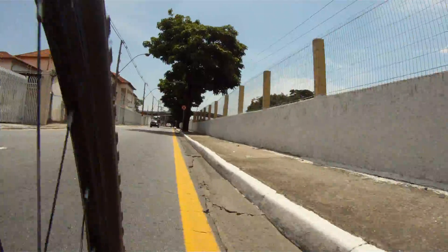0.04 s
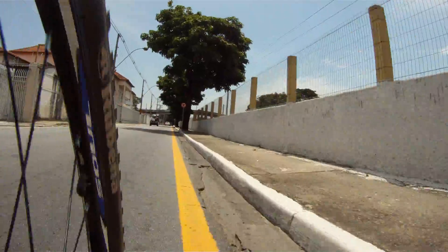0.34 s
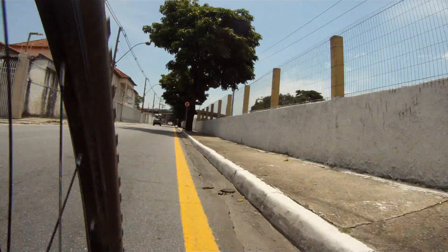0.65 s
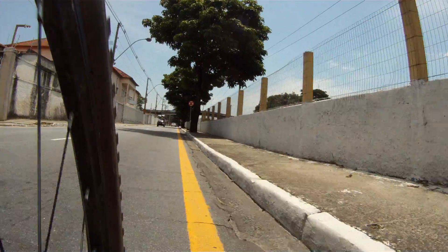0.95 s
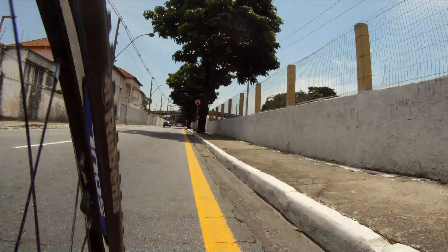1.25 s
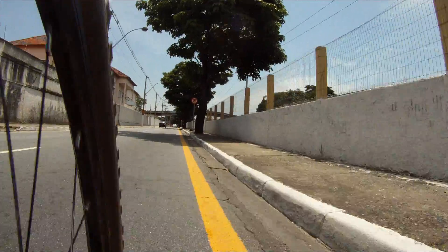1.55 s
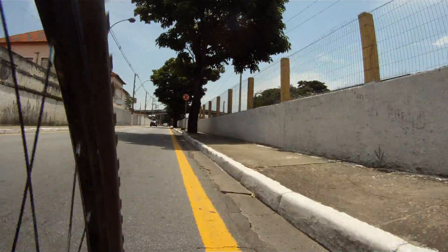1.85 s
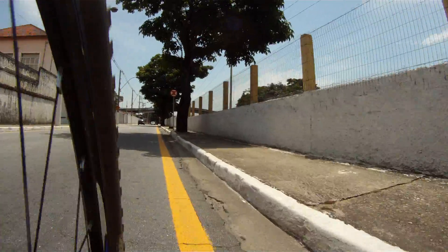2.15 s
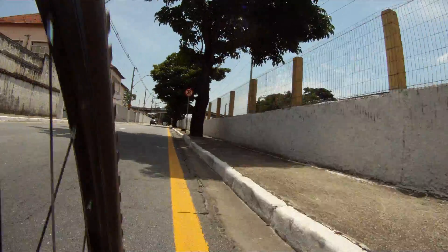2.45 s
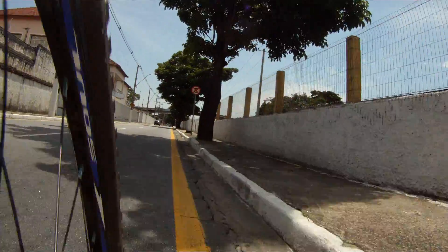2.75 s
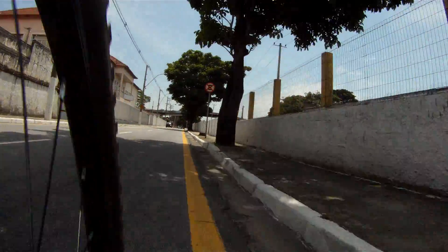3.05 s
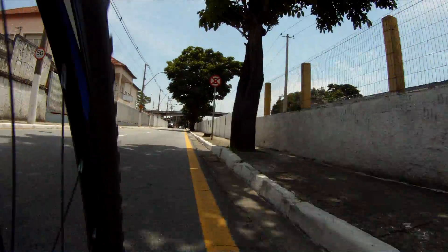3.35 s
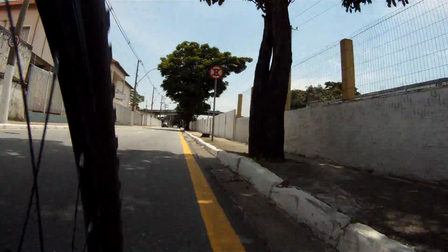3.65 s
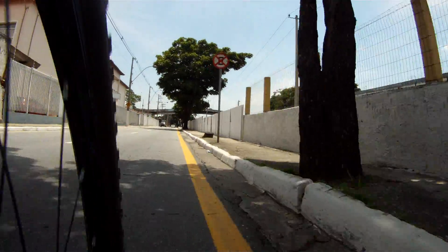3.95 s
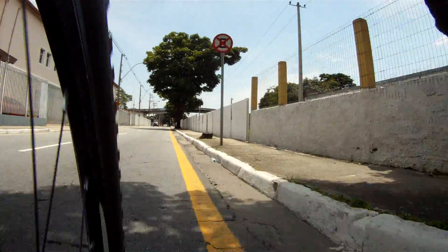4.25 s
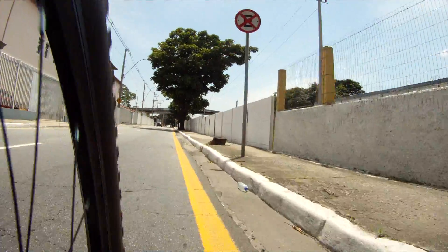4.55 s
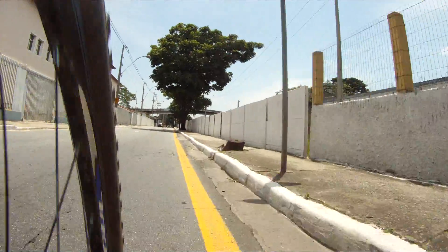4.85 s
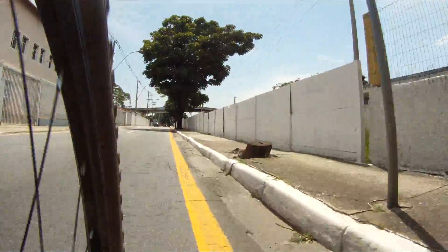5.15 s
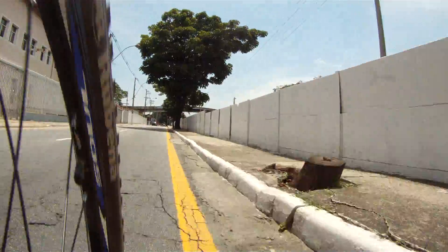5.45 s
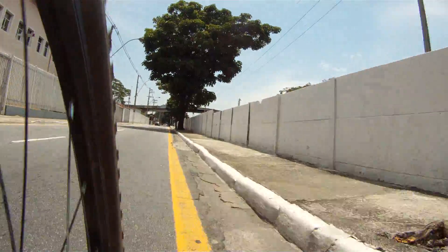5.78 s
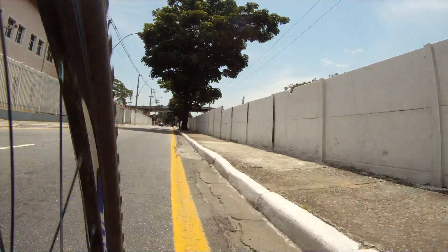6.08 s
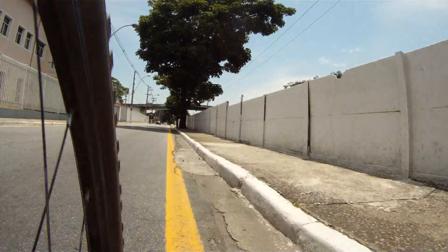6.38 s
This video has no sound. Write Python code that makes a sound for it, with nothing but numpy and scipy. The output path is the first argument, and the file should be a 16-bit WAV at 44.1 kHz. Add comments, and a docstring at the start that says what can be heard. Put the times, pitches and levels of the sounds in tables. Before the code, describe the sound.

A bicycle rolls along an asphalt street for about six and a half seconds, heard very close from beside the wheel. A low, fluttering tyre hum and the rumble of the frame on the rough surface dominate throughout. The hum wavers slightly with the pedalling and creeps up in pitch from about 2 seconds. At 0.3 seconds the wheel hits a crack with one hard thump, the loudest moment, and everything briefly ducks after it. Much softer bumps come at about 2 and 3.5 seconds. The chain rustles faintly in swells with the pedal strokes. Loose metal fittings give small irregular rattles, clustering around 1 second and 5 seconds. Grit ticks and sand crackles faintly under the tyre, and a faint, thin high whistle lies over everything. The hum drops away for an instant near 6.5 seconds, then returns.

```python
"""Bicycle on asphalt

Riding along a street, heard close up from the microphone of a small camera fixed beside the wheel.
The tread hums, the rough road shakes the frame, the chain rustles with the pedal strokes, loose
fittings rattle and grit ticks. One crack jolts the bicycle hard enough to duck the camera's limiter.
The camera holds each sample at a low rate, which mirrors the whole sound into a thin high whistle."""
import sys
import numpy as np
from scipy import signal
from scipy.fft import rfft, irfft
from scipy.io import wavfile
from scipy.ndimage import uniform_filter1d, minimum_filter1d

SR = 44100
rng = np.random.default_rng(int(sys.argv[2]) if len(sys.argv) > 2 else 0)


def put_to_file(sound):
    """Save the sound as 16-bit audio at rate SR, in the file named by the first command-line argument."""
    columns = np.atleast_2d(sound).T  # one column per channel
    safe = np.clip(columns, -1, 1)
    whole_steps = np.round(safe * 32767)
    wavfile.write(sys.argv[1], SR, whole_steps.astype(np.int16))


N = 291942
T = np.arange(N) / SR
BIN_HZ = np.fft.rfftfreq(N, 1 / SR)


# strength of the tread hum beside the wheel: time_s, relative_db
HUM_LEVEL = [(0, -13), (0.55, -15.5), (0.7, -13), (1.05, -14.5), (1.7, -13), (3.5, -13.5), (4.2, -12),
             (4.93, -17.5), (5.12, -13), (5.85, -17.5), (6.18, -14.5), (6.38, -13), (6.48, -30.5),
             (6.62, -14)]
# harmonics of the hum: multiple, relative_db
HUM_HARMONICS = [(1, -2), (2, -19.5), (3, -24.5), (4, -38.5)]
def tyre(blocks, level_db=-1.4, dip_db=6.0, dip_per_road_db=0.15, flutter_hz=16):
    """The tread hums next to the microphone; bumps unload the tyre and make the hum dip briefly."""
    hum = sum(gain_of(db) * np.sin(2 * np.pi * (round(multiple) * blocks + rng.random()))
              for multiple, db in HUM_HARMONICS)
    bumps_db = curve(ROAD_ROUGHNESS)
    unevenness = np.exp(dip_per_road_db * (bumps_db - bumps_db.mean()))  # rougher road, deeper dips
    lift = np.tanh(np.maximum(drift(flutter_hz), 0) ** 2 / 2)
    return unit_rms(hum) * gain_of(curve(HUM_LEVEL) + level_db - dip_db * unevenness * lift)


# riding speed, as the rate of tread blocks meeting the road: time_s, pitch_hz
TREAD_RATE = [(0, 137.5), (1.05, 136.1), (2.2, 141.1), (2.42, 144.3), (2.65, 143.8), (4.0, 147.4),
              (4.7, 145.7), (5.95, 149.8), (6.62, 146.8)]
def tread_blocks(push_every_s=0.505, surge_at_s=0.383, surge_hz=1.29, waver=0.0062):
    """Count of tread blocks that have met the road; the speed surges a little with each leg's push."""
    surge = surge_hz * np.cos(2 * np.pi * (T - surge_at_s) / push_every_s)
    rate_hz = (curve(TREAD_RATE) + surge) * (1 + waver * drift(13.7))
    return np.cumsum(rate_hz) / SR


# unevenness of the street under the wheel: time_s, long_bumps_db, coarse_grain_db
ROAD_ROUGHNESS = [(0.0, -22, -19), (0.55, -21.5, -19.5), (0.75, -24.5, -21.5), (1.15, -25, -17),
                  (1.35, -26.5, -19), (1.8, -28, -25), (2.1, -26, -21.5), (2.9, -27, -23),
                  (3.4, -23.5, -21), (4.2, -30.5, -24), (4.62, -22, -19.5), (4.88, -25.5, -23.5),
                  (5.01, -21.5, -18.5), (5.27, -29, -24.5), (5.5, -23.5, -18), (5.85, -18.5, -20),
                  (6.2, -28.5, -20), (6.62, -18, -18)]
# the whole bicycle bouncing and flexing on its tyres: pitch_hz, width_hz, relative_db
SWAY_MODES = [(25, 12, -6), (54, 18, 0), (88, 15, 5), (121.2, 13, 3)]
# resonances of the frame and camera mount: pitch_hz, width_hz, relative_db
FRAME_MODES = [(166, 50.4, 0.5), (239.6, 27, -1), (285, 56, -7.5), (334, 76, -13), (405, 55, -11),
               (426.6, 33, -12.5), (550, 49, -22.5), (759, 98, -27)]
def frame(drumming_db=-1.0, flicker_db=0.8):
    """Long bumps rock the bicycle; the stones of the asphalt drum on frame and mount."""
    sway = coloured_noise(modes(SWAY_MODES)) * gain_of(curve(ROAD_ROUGHNESS))
    stones = clicks(per_s=2500, spread_db=3.5) * gain_of(flicker_db * drift(35))
    drumming = unit_rms(ring(stones, modes(FRAME_MODES)))
    return sway + drumming * gain_of(curve(ROAD_ROUGHNESS, column=2) + drumming_db)


# cracks in the street: crest_s, envelope_peak_db, pitch_hz, rise_s
CRACKS = [(0.3228, 8.5, 194, 0.004), (2.041, -11, 290, 0.0016), (3.456, -16, 297, 0.0037)]
def jolts(clatter_db=-33, scrape_db=-47, fall_ratio=0.62):
    """A crack thumps the frame, swelling and stopping short; housing and sand clatter with it."""
    thump, shake = np.zeros(N), np.zeros(N)
    for crest_s, db, hz, rise_s in CRACKS:
        width_s = np.where(T < crest_s, rise_s, fall_ratio * rise_s)
        push = gain_of(db) * np.exp(-((T - crest_s) / width_s) ** 2)
        thump += push * np.sin(2 * np.pi * hz * (T - crest_s))
        shake += push
    clatter = gain_of(clatter_db) * coloured_noise(modes(HOUSING_MODES))
    scrape = gain_of(scrape_db) * coloured_noise(colour(GRIT_COLOUR))
    return thump + shake * (clatter + scrape)


# hard pedal strokes that make the chain rustle: middle_s, swell_db, length_s
PEDAL_STROKES = [(0.25, 2, 0.5), (1.08, 4.5, 0.35), (2.06, 3, 0.24), (2.76, 4, 0.1), (3.16, 4.5, 0.38),
                 (4.08, 4.5, 0.17), (4.66, 2.5, 0.2), (5.04, 4, 0.2), (5.48, 2, 0.3), (6.15, 4.5, 0.28),
                 (6.6, 5.5, 0.14)]
# the camera housing around the microphone: pitch_hz, width_hz, relative_db
HOUSING_MODES = [(739, 90, 4), (813.6, 44, 8.5), (1030, 98, -6.5), (1113, 190, -4), (1300, 43, 2.5),
                 (1450, 210, -4.5), (1745, 140, -2.5), (2027, 110, -2), (2300, 400, -5.5), (3060, 160, -19),
                 (3510, 250, -15), (4770, 2700, -25.5)]
def chain(blocks, rustle_db=-47.0, jingle_db=-59.0, flicker_db=2.5, waver_db=0.58, throb=0.18):
    """Dense knocks of the links ring the housing in time with the tread; a few jingle the fittings."""
    knocks = clicks(per_s=5000, spread_db=0.5) * gain_of(flicker_db * drift(77))
    knocks *= 1 + throb * np.cos(2 * np.pi * blocks)
    rustle = gain_of(rustle_db) * unit_rms(ring(knocks, modes(HOUSING_MODES)))
    t = np.arange(4096) / SR
    metal = sum(gain_of(db - 60 * t / t60) * np.sin(2 * np.pi * hz * t) for hz, db, t60 in FITTING_MODES)
    taps = clicks(per_s=55, spread_db=2.5)
    jingle = gain_of(jingle_db) * unit_rms(signal.oaconvolve(taps, metal)[:N])
    return (rustle + jingle) * gain_of(swells(PEDAL_STROKES) + waver_db * drift(18))


# knocks of loose fittings on the bicycle: start_s, relative_db
FITTING_KNOCKS = [(0.8882, -36.5), (1.0228, -33.5), (1.153, -31.5), (1.23, -35), (1.8097, -36.5),
                  (2.0334, -31.5), (2.2886, -34), (2.967, -38), (2.9857, -35), (3.7478, -35),
                  (3.997, -37.5), (4.2657, -39), (4.7329, -34), (4.9622, -32.5), (4.996, -36),
                  (5.218, -39.5), (5.27, -40), (5.369, -33), (5.574, -39), (5.9918, -37), (6.1956, -35),
                  (6.2583, -34)]
# ring of the metal fittings: pitch_hz, relative_db, t60_s
FITTING_MODES = [(1290, -6.5, 0.021), (1750, -3.5, 0.031), (2280, -7, 0.025), (2364, 4, 0.043),
                 (2360, -6, 0.033), (3190, -11, 0.059), (3550, -5.5, 0.031)]
def rattles(level_db=3.0, vary_db=3.5):
    """Each knock rings the same metal fittings in a slightly different mix."""
    t = np.arange(4096) / SR
    hz, db, t60 = np.transpose(FITTING_MODES)[:, :, None]
    track = np.zeros(N + len(t))
    for start_s, knock_db in FITTING_KNOCKS:
        mix, polarity = rng.standard_normal((2, len(FITTING_MODES), 1))
        decays = gain_of(db + vary_db * mix - 60 * t / t60)
        knock = (decays * np.sign(polarity) * np.sin(2 * np.pi * hz * t)).sum(0)
        track[round(start_s * SR):][:len(t)] += gain_of(knock_db + level_db) * knock / abs(knock).max()
    return track[:N]


# larger grains of grit under the tyre: start_s, relative_db
GRIT_TICKS = [(0.169, -42), (0.198, -49), (0.472, -50), (0.61, -42), (0.6605, -35), (1.596, -44),
              (1.9894, -36.5), (2.5326, -42), (2.6717, -41.5), (3.09, -41.5), (3.302, -43), (3.478, -45),
              (3.5793, -43), (3.688, -45), (3.7479, -41), (4.5989, -41), (4.612, -45), (4.6573, -41.5),
              (4.784, -39), (4.897, -42), (4.9547, -41), (5.0163, -45), (5.667, -45), (5.873, -43),
              (5.9905, -44), (6.2657, -42), (6.4223, -43.5)]
# colour of grit at the microphone: frequency_hz, gain_db
GRIT_COLOUR = [(300, -28), (1200, -9.5), (2300, -2), (2900, -3.5), (3600, -1.5), (4200, -5), (4900, -0.5),
               (5600, -2), (6300, -3.5)]
def grit(level_db=20.0, grain_hz=4000, pitch_spread=0.063, crumble=0.4, crumble_s=0.0034):
    """A larger grain snaps under the tyre, then crumbles for a moment."""
    t = np.arange(512) / SR
    track = np.zeros(N + 1024)
    for start_s, db in GRIT_TICKS:
        fragments = rng.standard_normal(len(t))
        hz = grain_hz * np.exp(pitch_spread * np.tanh(fragments[-1]))
        fracture = (t == 0) + crumble * fragments * np.exp(-t / crumble_s)
        tick = np.convolve(fracture, snap(hz, ring_s=0.00019))
        track[round(start_s * SR):][:len(tick)] += gain_of(db + level_db) * tick / np.linalg.norm(tick)
    return ring(track[:N], colour(GRIT_COLOUR))


# patches of loose sand on the asphalt: middle_s, swell_db, length_s
LOOSE_SAND = [(0.22, 7, 0.47), (0.64, 8.5, 0.12), (1.17, 6, 0.054), (3.45, 3, 0.6), (4.63, 7, 0.14),
              (5.0, 10, 0.067), (5.55, 3.5, 0.41), (6.24, 3, 0.16), (6.56, 10, 0.11)]
def sand(level_db=-66.0, grains_per_s=120, pitch_count=12):
    """Sand crackles faintly under the tyre at a spread of pitches, louder in the patches."""
    crackle = np.zeros(N)
    for hz in np.geomspace(3100, 5300, pitch_count):
        grains = clicks(grains_per_s / pitch_count, spread_db=1.8)
        crackle += signal.oaconvolve(grains, snap(hz, ring_s=0.0002))[:N]
    return unit_rms(ring(crackle, colour(GRIT_COLOUR))) * gain_of(level_db + swells(LOOSE_SAND))


def snap(hz, ring_s):
    """One grain breaking: a few dying cycles of peak 1."""
    t = np.arange(256) / SR
    wave = np.sin(2 * np.pi * hz * t) * np.exp(-t / ring_s)
    return wave / abs(wave).max()


def clicks(per_s, spread_db):
    """Random clicks of both signs, a few larger than the rest."""
    size = gain_of(spread_db * np.minimum(rng.exponential(1, N), 4))
    return unit_rms(size * rng.choice([-1, 1], N) * (rng.random(N) < per_s / SR))


def ring(x, gain):
    """Passes x through a causal (minimum-phase) body with the given gain at each frequency."""
    log_gain = np.log(np.maximum(gain / gain.max(), 1e-5))
    cepstrum = irfft(log_gain, N) * 2 * (np.arange(N) < N // 2)
    return irfft(rfft(x) * np.exp(rfft(cepstrum) - log_gain.mean()), N)


def coloured_noise(gain):
    """Noise rung through a body, at rms 1."""
    return unit_rms(ring(rng.standard_normal(N), gain))


def modes(rows):
    """Gain of a set of steep-sided resonances."""
    power = 0
    for hz, width_hz, db in rows:
        peak = gain_of(db) / (1 + 2 * ((BIN_HZ - hz) / width_hz) ** 2)
        power += peak ** 2 / (1 + (BIN_HZ / (2 * hz)) ** 4)
    return np.sqrt(power)


def colour(points):
    """Gain joining the points along a log frequency axis."""
    hz, db = np.transpose(points)
    return gain_of(np.interp(np.log(BIN_HZ + 1), np.log(hz), db))


def swells(rows):
    """Level in dB of a row of rounded, flat-topped swells."""
    return sum(db / (1 + (2 * (T - middle_s) / length_s) ** 6) for middle_s, db, length_s in rows)


def drift(hz):
    """Random wander of rms 1, up to about the given rate."""
    return unit_rms(irfft(rfft(rng.standard_normal(N)) / (1 + (BIN_HZ / hz) ** 4), N))


def curve(rows, column=1):
    """One column of a table at every sample."""
    rows = np.asarray(rows)
    return np.interp(T, rows[:, 0], rows[:, column])


def gain_of(db):
    """Decibels to amplitude."""
    return 10 ** (np.asarray(db) / 20)


def unit_rms(x):
    """Scales to rms 1."""
    return x / np.sqrt(np.mean(x ** 2) + 1e-20)


def limiter(x, ceiling_db=-1.5, recover_db_per_s=55):
    """A peak over the ceiling turns the gain down at once; it creeps back up."""
    over_db = np.maximum(20 * np.log10(abs(x).max(0) + 1e-9) - ceiling_db, 0)
    recovery_db = recover_db_per_s * T
    cut_db = np.maximum.accumulate(over_db + recovery_db) - recovery_db
    return x * gain_of(uniform_filter1d(minimum_filter1d(-cut_db, size=65), size=65))


def sample_and_hold(x, hold_hz=12000, band_hz=5250):
    """Holding each sample mirrors the low band faintly on both sides of the hold rate."""
    narrow = irfft(rfft(x) / np.sqrt(1 + (BIN_HZ / band_hz) ** 22), N)
    mirrored = narrow * (1 + 2 * np.cos(2 * np.pi * hold_hz * T))
    return irfft(rfft(mirrored) * np.sinc(BIN_HZ / hold_hz), N)


def scene():
    """Everything reaches the one microphone beside the wheel through the frame."""
    blocks = tread_blocks()
    return (tyre(blocks) + frame() + chain(blocks) + sand() + grit() + rattles() + jolts())[None]


def record(dry):
    """Inside the camera: limiter, sample and hold, then a steep treble cut."""
    faded = limiter(dry) * signal.windows.tukey(N, 0.0012)  # a few ms of fade at each end
    lowpass = signal.firwin(255, cutoff=15400, window=("kaiser", 9), fs=SR)
    return signal.oaconvolve(sample_and_hold(faded), lowpass[None], "same")


dry = scene()
out = record(dry)
put_to_file(out)
```